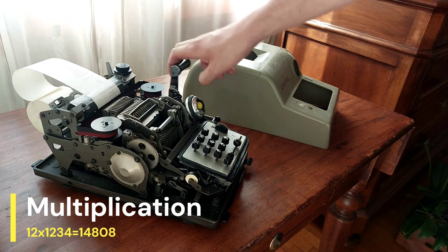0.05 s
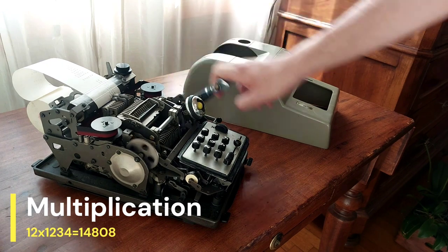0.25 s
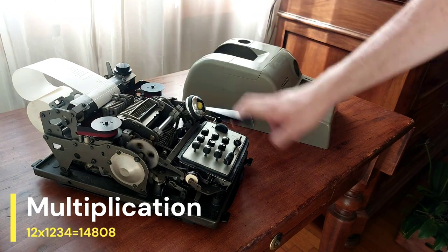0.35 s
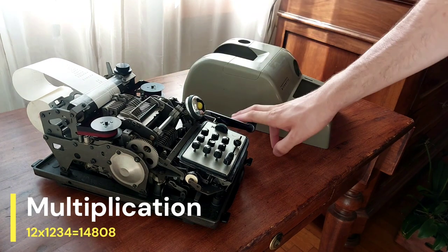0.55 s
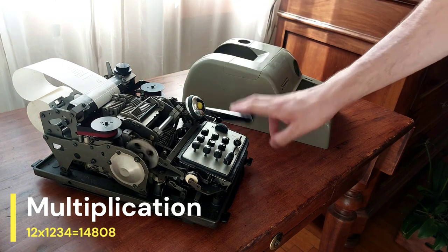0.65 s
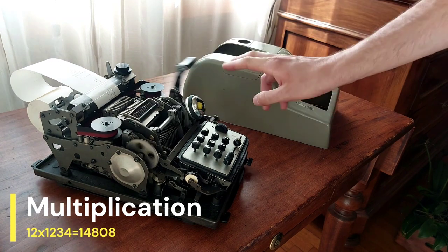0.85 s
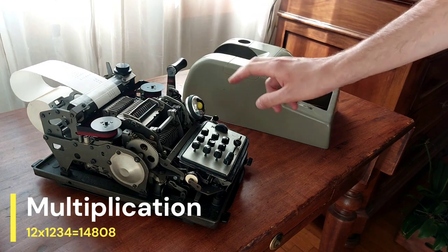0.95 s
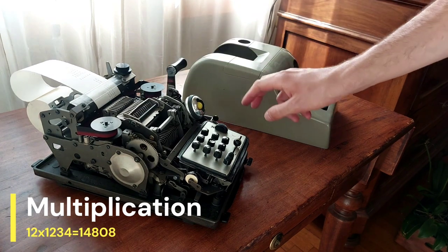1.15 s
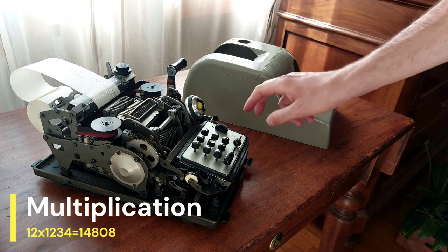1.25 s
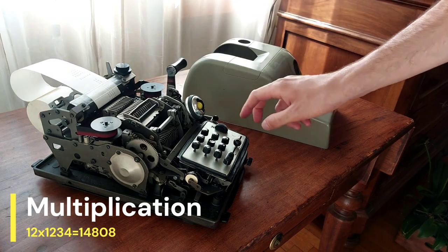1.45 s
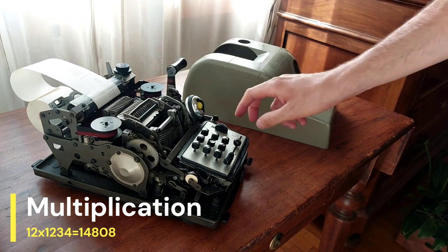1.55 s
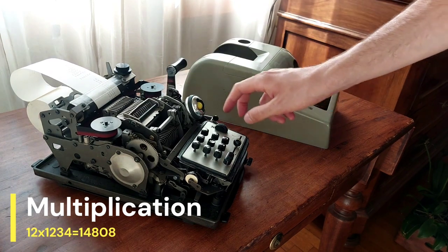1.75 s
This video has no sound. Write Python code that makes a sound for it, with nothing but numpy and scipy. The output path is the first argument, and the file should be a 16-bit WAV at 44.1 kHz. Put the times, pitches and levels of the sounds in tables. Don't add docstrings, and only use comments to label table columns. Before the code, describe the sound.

A mechanical calculator's lever is pulled and springs back with hard ratcheting clatter on a wooden table

```python
import sys
import numpy as np
from scipy import signal
from scipy.fft import rfft, irfft, next_fast_len
from scipy.io import wavfile
from scipy.ndimage import uniform_filter1d

SR = 44100
rng = np.random.default_rng(int(sys.argv[2]) if len(sys.argv) > 2 else 0)


def materialize(psi):
    bounded = np.clip(np.atleast_2d(psi).T, -1, 1)
    quanta = np.round(bounded * 32767).astype(np.int16)
    wavfile.write(sys.argv[1], SR, quanta)


def how_loud(loudness_db):
    steps = np.asarray(loudness_db, float) / 20
    return 10 ** steps


N = 79380


def unit(x):
    return x / np.sqrt(np.mean(x ** 2) + 1e-20)


def along(points, hz):
    f, v = np.transpose(points)
    return np.interp(np.log(hz + 1), np.log(f + 1), v)


def filtered(x, response):
    m = next_fast_len(N + SR // 2)
    return irfft(rfft(x, m) * response(np.fft.rfftfreq(m, 1 / SR)), m)[..., :N]


def coloured(x, spectrum):
    return filtered(x, lambda hz: unit(how_loud(along(spectrum, hz))))


def paired(x, alike):
    turn = lambda hz: np.arccos(np.clip(along(alike, hz), -1, 1)) / 2
    mid, side = filtered(x, lambda hz: np.array([np.cos(turn(hz)), np.sin(turn(hz))]))
    return np.array([mid + side, mid - side])


def ringing(modes, t, focus_hz=300., focus_db=0.):
    out = 0
    for hz, db, t60 in modes:
        octaves = np.log2(hz / focus_hz)
        near_db = focus_db * (np.exp(-(octaves / 0.55) ** 2) - 1)
        decay = how_loud(db + near_db + rng.normal(0, 2.12) - 60 * t / t60)
        out = out + decay * np.sin(2 * np.pi * hz * (1 + rng.normal(0, 0.011)) * t)
    return out


# frequency in Hz, density in dB per Hz.
FLOOR = [(15, -40.5), (25, -26.5), (121, -7), (162, -12.5), (305, -19.5), (408, -21), (700, -25.5),
         (1500, -34), (2200, -89)]
# frequency in Hz, density in dB per Hz.
HISS = [(880, -45.5), (1500, -18), (1780, -10.5), (2020, -7), (2520, 2.5), (3500, -26.5), (4810, -32.5),
        (5300, -31.5), (15000, -33.5)]
# frequency in Hz, likeness from -1 to 1.
FLOOR_ALIKE = [(60, 0.55), (240, 0.13), (950, 0.079), (3770, -0.12), (15000, -0.13)]


def floor():
    air_db, hiss_db, pan_db, hiss_top_hz = -66, -69, 5.5, 15300
    swell = how_loud(1.12 * unit(uniform_filter1d(rng.standard_normal(N), SR // 15)))
    early_db, settle_s = 9.5, 0.95
    settle_db = early_db * np.exp(-(np.arange(N) / SR / settle_s) ** 2)
    air = unit(paired(coloured(rng.standard_normal((2, N)), FLOOR), FLOOR_ALIKE))
    hiss = unit(paired(coloured(rng.standard_normal((2, N)), HISS), FLOOR_ALIKE))
    hiss = filtered(hiss, lambda hz: hz < hiss_top_hz)
    air = how_loud(air_db + 0.38 * settle_db) * unit(swell * air)
    return how_loud([[pan_db / 2], [-pan_db / 2]]) * (air + how_loud(hiss_db + settle_db) * hiss)


# frequency in Hz, t60 in seconds.
ROOM = [(100, 0.22), (260, 0.55), (700, 0.46), (1800, 0.4), (5000, 0.34), (13000, 0.28)]
# frequency in Hz, likeness from -1 to 1.
ROOM_ALIKE = [(100, 1), (400, 1), (1500, 0.02)]


def room(x):
    tail_db, walls_db = -2.5, -10.5
    curtain_hz = 10900
    stretch, delay = SR // 8, 300
    out = np.zeros((2, N))
    dull = filtered(x, lambda hz: 1 / (1 + 1j * hz / curtain_hz))
    for a in np.arange(0, round(1.1 * SR), stretch):
        hz, t, z = signal.stft(rng.standard_normal((2, SR // 2)), SR, nperseg=256)
        dying = z * how_loud(-60 * t / along(ROOM, hz)[:, None])
        tail = signal.istft(dying, SR, nperseg=256)[1]
        wet = signal.fftconvolve(dull[None, a:a + stretch], tail / np.linalg.norm(tail[0]), axes=1)
        out[:, a + delay:][:, :wet.shape[1]] += wet[:, :N - a - delay]
    echoes, draw = np.zeros((2, SR // 40)), rng.random((2, 8))
    for ch in range(2):
        at = (30 + draw[ch] ** 2 * 1000).astype(int)
        echoes[ch, at] = how_loud(walls_db - 6.7 * draw[ch]) * (-1) ** np.arange(8)
    walls = signal.fftconvolve(x[None], echoes, axes=1)[:, :N]
    return how_loud(tail_db) * paired(out, ROOM_ALIKE) + walls


def rocking():
    hz, t60, level_db, rise_s = 624, 0.1, -50.5, 0.0091
    every_s, loss_db = 0.086, 1.2
    panel = [(hz, 0, t60), (hz * 1.08, -8, t60), (hz / 1.6, -3, t60), (hz * 0.83, -8, t60)]
    out, t = np.zeros(N + SR), np.arange(SR // 5) / SR
    for start_s, count in [(1.005, 6), (0.56, 2)]:
        for k in range(count):
            soft = 1 - np.exp(-(t / rise_s) ** 2)
            at = round((start_s + k * every_s) * SR)
            out[at:][:len(t)] += how_loud(level_db - k * loss_db) * soft * ringing(panel, t)
    return out[:N]


# time in seconds, level in dB.
PULL_RATTLE = [(0, -71.5), (.06, -69.5), (.15, -63), (.208, -57), (.22, -52), (.3, -39.5), (.44, -40.5),
               (.49, -34), (.54, -57)]
# time in seconds, level in dB.
BACK_RATTLE = [(0.692, -66), (0.736, -55), (0.765, -41), (.85, -41.5), (.91, -40), (.928, -44),
               (.965, -37.5), (1.0, -45), (1.049, -75.5)]


def motion():
    t = np.arange(N) / SR
    strokes = (np.transpose(PULL_RATTLE), np.transpose(BACK_RATTLE))
    return sum(how_loud(np.interp(t, *stroke, left=-120, right=-120)) for stroke in strokes)


# start in seconds, peak in dB, loudest region in Hz.
BLOWS = [(0.002, -44.5, 60), (0.02, -48.5, 123), (0.094, -43, 122), (0.172, -39.5, 410),
         (0.277, -33.5, 295), (0.342, -29, 174), (0.411, -39, 192), (0.455, -31.5, 89), (0.465, -17, 81),
         (0.467, -25, 410), (0.491, -21.5, 63.5), (0.518, -25.5, 200), (0.545, -31.5, 242),
         (0.766, -32, 294), (0.775, -29.5, 111), (0.811, -31.5, 136), (0.851, -32.5, 178.8),
         (0.874, -33.5, 175), (0.915, -30.5, 59.9), (0.957, -28.5, 96.1), (0.962, -24.5, 330),
         (0.99, -26.5, 83.5), (1.003, -32.5, 245), (1.035, -27, 70), (1.065, -35.5, 75)]
# start in seconds, peak in dB, pitch in Hz.
KNOCKS = [(0.25, -38.5, 1000), (0.45, -26, 5150), (0.451, -27, 1115), (0.471, -29.5, 1000),
          (0.52, -37.5, 554), (0.768, -47, 673), (0.806, -31, 944), (0.887, -27.5, 958),
          (0.957, -29.5, 1006), (0.96, -29, 778), (0.99, -33.5, 714)]
# frequency in Hz, level in dB, t60 in seconds.
TABLE = [(72, -3, 0.092), (117.2, 3, 0.07), (175, -1.5, 0.18), (236.3, -5, .18), (293.3, -1.5, 0.086),
         (410, -5.5, 0.15), (477, -19, 0.16), (48.4, -6.5, 0.037), (215.2, -5.5, 0.16)]
LOW_HZ = 94


def table():
    blow_db, rise_s, focus_db = -2.5, 0.0029, 12
    own_share = 0.51
    base_db, base_t60 = -6.5, 0.079
    rumble_db = -4.5
    top, t = np.zeros((2, N + SR)), np.arange(SR // 3) / SR
    for s, db, hz in BLOWS:
        lags = (0, *rng.random(2) / LOW_HZ)
        shared, *own = (ringing(TABLE, t + lag, hz, focus_db) for lag in lags)
        blow = (shared + own_share * np.array(own)) * (1 - np.exp(-t / rise_s))
        top[:, round(s * SR):][:, :len(t)] += how_loud(db + blow_db) * blow
    for s, db, hz in KNOCKS:
        base = [(hz, 0, base_t60), (hz * 0.95, -6, base_t60), (hz * 0.83, -11, base_t60)]
        top[:, round(s * SR):][:, :len(t)] += how_loud(db + base_db) * ringing(base, t)

    def wood(f):
        out = 0
        for hz, db, t60 in TABLE:
            damping = 1j * f * np.pi / t60
            out = out + how_loud(db) * damping / (hz * hz - f * f + damping)
        return out

    shake = rng.standard_normal(N) + own_share * rng.standard_normal((2, N))
    rumble = filtered(motion() * shake, wood) / np.std(filtered(shake, wood))
    return top[:, :N] + how_loud(rumble_db) * rumble


# frequency in Hz, density in dB per Hz.
RACKS = [(330, 0), (600, -4.5), (1000, -2.5), (2500, 1), (5200, -5), (9000, -24), (13000, -18),
         (15800, -23.5)]


def racks():
    grains_per_s, grain_db, grain_t60 = 1100, 4.5, 0.0056
    rub_share, own_share, level_db = 0.32, 0.8, -0.37
    uneven = how_loud(grain_db * np.minimum(rng.exponential(size=N), 2))
    sizes = (rng.random(N) < grains_per_s / SR) * uneven
    decay = how_loud(-60 * np.arange(SR // 50) / SR / grain_t60)
    shape = signal.fftconvolve(sizes, decay)[:N]
    teeth, rub = rng.standard_normal((2, 1, N)) + own_share * rng.standard_normal((2, 2, N))
    rattle = (1 - rub_share) * unit(shape * teeth) + rub_share * rub
    return how_loud(level_db) * motion() * unit(coloured(rattle, RACKS))


# start in seconds, peak in dB, dullness 0-1.
TICKS = [(0.001, -54, 0.9), (0.018, -52, 0.97), (0.0875, -52.5, 1), (0.0915, -64, 1), (0.1078, -65, 0.8),
         (0.1277, -39, 0), (0.152, -56, 1), (0.1625, -44.5, .8), (0.1688, -33, 0.25), (0.195, -46, .9),
         (0.6821, -43.5, 0.52), (0.6934, -53, 1), (0.7216, -37.5, 0), (0.731, -44, 0.45),
         (0.7447, -33.5, 0.66), (0.7487, -35, 0.7), (0.754, -33, .6)]
# start in seconds, peak in dB, dullness 0-1, length as a factor.
PULL = [(0.2154, -11, 0.27, 1.28), (0.2238, -12.5, 0.24, 1.4), (0.2453, -11.5, 0.2, 1.4),
        (0.2699, -20, 0.47, 1.3), (0.2787, -22, 0.8, 1.1), (0.2922, -8, 0.18, 1.3),
        (0.3213, -23.5, 0.6, 1.3), (0.3353, -6, 0.17, 1.07), (0.3545, -20.5, 0.3, 1.2),
        (0.376, -7.5, 0.2, 0.71), (0.41, -6.5, 0.22, 0.83), (0.4329, -7.5, 0.37, 0.91),
        (0.4499, -6, 0.43, 1.22), (0.4604, -11, 0.4, 1.6), (0.4687, -12, 0.47, 1.6),
        (0.4752, -8.5, 0.35, 1.73), (0.478, -14.5, 0.69, 0.71), (0.4804, -10.5, 0, 1.2),
        (0.4908, -24.5, 0.1, 1.4), (0.509, -22, 0, 3)]
# start in seconds, peak in dB, dullness 0-1, length as a factor.
BACK = [(0.7614, -22, 0.32, 2.5), (0.7652, -25, 0.45, 3.1), (0.772, -23.5, .4, 2.2),
        (0.7826, -14, 0.1, 1.7), (0.796, -28.5, 1, 1.3), (0.8113, -12, 0.2, 1.6), (0.8228, -9.5, 0.2, 1.4),
        (0.8237, -11.5, .2, 1.3), (0.828, -15.5, 0.27, 1.3), (0.8398, -12.5, 0.1, 1.3),
        (0.8503, -12, 0.1, 1.6), (0.8551, -21.5, .4, 1.1), (0.8676, -13.5, 0.3, 1.4), (0.89, -23.5, 1, 1.3),
        (0.9011, -15.5, 0.1, 1.5), (0.9335, -13.5, 0.08, 2), (0.9492, -18, 0.3, 1.5),
        (0.9582, -13, 0.55, 1.48), (0.9628, -17, 0.45, 1.93), (0.9672, -16.5, 0.4, 1.7),
        (0.9704, -22, 0.4, 1.5), (0.9769, -25.5, .4, 1.2), (0.9813, -23.5, 0.64, 1.8),
        (0.9847, -24, 0.2, 1.4), (0.995, -26, 0.6, 1.5)]
# frequency in Hz, density in dB per Hz.
PAWL = [(600, -52.5), (1500, -25), (5000, -13), (7500, -9), (11000, -10.5), (12800, 2), (15000, -1),
        (16500, -14)]
# frequency in Hz, density in dB per Hz.
TAP = [(1500, -30.5), (3200, -5.5), (5300, 2.5), (7500, -5.5), (10000, -8), (14000, -21.5)]
# frequency in Hz, density in dB per Hz.
CLANK = [(290, -39), (500, -20.5), (2870, -3.5), (5120, -2.5), (6090, -2.5), (12500, -2.5), (15800, -16)]
# frequency in Hz, level in dB, t60 in seconds.
STEEL = [(2153, -6, 0.25), (3137, -0.5, 0.078), (3580, -0.5, 0.049), (4956, 3.5, 0.045), (5315, -0.5, 0.11),
         (7120, -3, 0.09), (13100, -11, .03)]


def clicks():
    snap_t60, clank_t60, rise_s = 0.009, 0.021, 0.00044
    buzz_db, buzz_t60, ring_db = -19, 0.082, -24
    own_share = 0.78
    snap, clank, tap, ring = np.zeros((4, 2, N))
    t = np.arange(SR // 8) / SR
    events = [(*row, 1, tap) for row in TICKS] + [(*row, clank) for row in PULL + BACK]
    for s, db, dull, long, body in events:
        here = slice(round(s * SR), round(s * SR) + len(t))
        noise = rng.standard_normal((3, 3, len(t)))
        noise = np.sqrt(1 - own_share) * noise[:, :1] + np.sqrt(own_share) * noise[:, 1:]
        gain = how_loud(db) * (1 - np.exp(-t / (rise_s * long)))
        buzz = how_loud(buzz_db - 60 * t / buzz_t60) * noise[2]
        snap[:, here] += gain * (1 - dull) * (how_loud(-60 * t / (snap_t60 * long)) * noise[0] + buzz)
        body[:, here] += gain * dull * (how_loud(-60 * t / (clank_t60 * long)) * noise[1] + buzz)
        ring[:, here] += gain * dull * how_loud(ring_db) * ringing(STEEL, t)
    return 0.74 * (coloured(snap, PAWL) + coloured(clank, CLANK) + coloured(tap, TAP)) + ring


def scene():
    lead_s, pan_db, bass_pan_db = 0.0002, 3.5, 6
    feet_hz = 38
    side = np.array([[.5], [-.5]])
    pan = how_loud(pan_db * side)

    def wood_path(hz):
        lean = how_loud(bass_pan_db * side / (1 + (hz / LOW_HZ) ** 4))
        return lean / (1 - 1j * feet_hz / (hz + 1)) ** 2

    wood = filtered(table(), wood_path)
    direct = pan * (clicks() + racks()) + wood
    early = filtered(direct, lambda hz: np.exp(2j * np.pi * hz * lead_s * side))
    into_room = (direct - 0.5 * wood).mean(axis=0)
    return early + pan * room(into_room) + pan * rocking() + floor()


def roll_off(x):
    return signal.sosfilt(signal.butter(12, 16960, fs=SR, output="sos"), x)


def record(dry):
    top_hz, edge_hz, slope_hz, ledge_db = 16900, 15900, 350, -27

    def band(hz):
        return (hz < top_hz) * how_loud(ledge_db * np.clip((hz - edge_hz) / slope_hz + .5, 0, 1))

    return roll_off(filtered(dry, band))


dry = scene()
out = record(dry)
materialize(out)
```